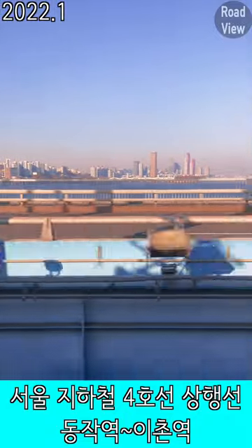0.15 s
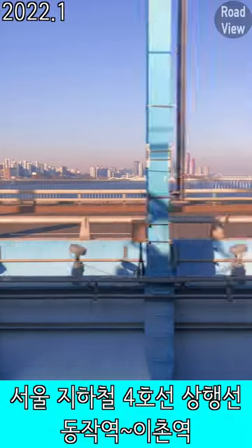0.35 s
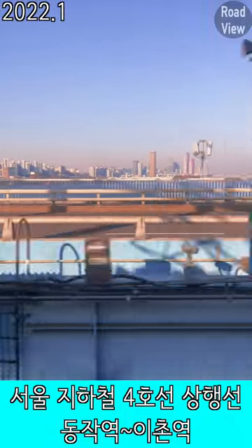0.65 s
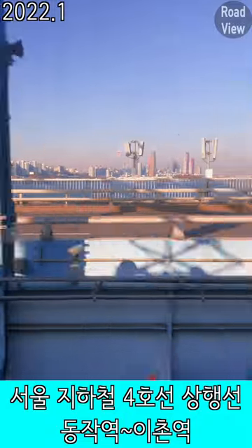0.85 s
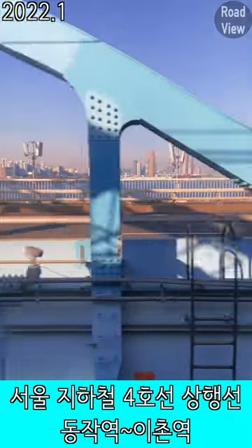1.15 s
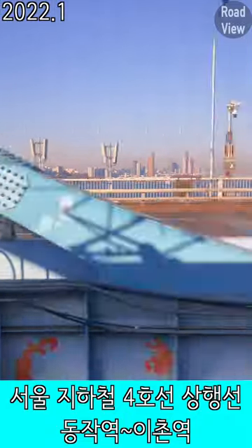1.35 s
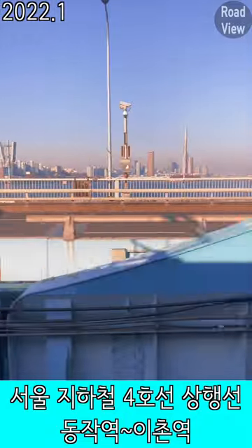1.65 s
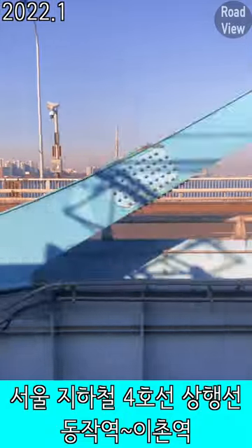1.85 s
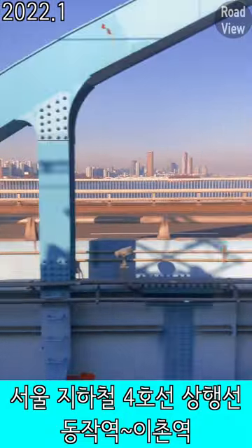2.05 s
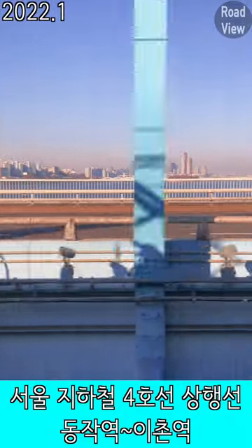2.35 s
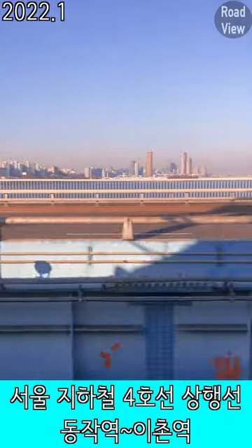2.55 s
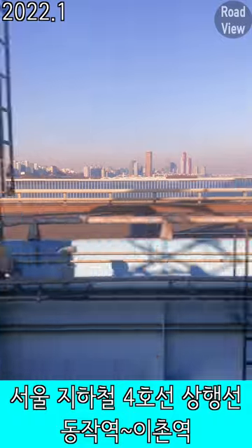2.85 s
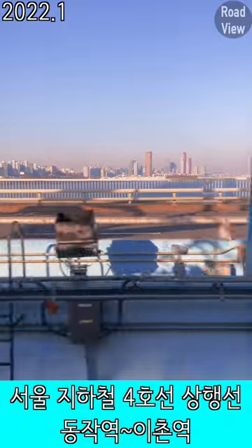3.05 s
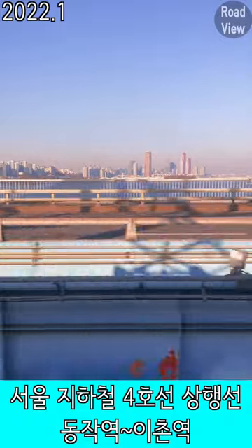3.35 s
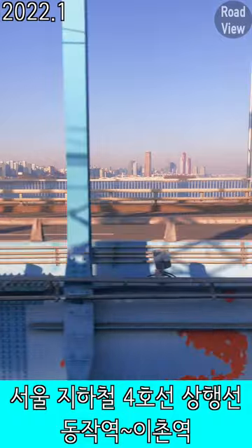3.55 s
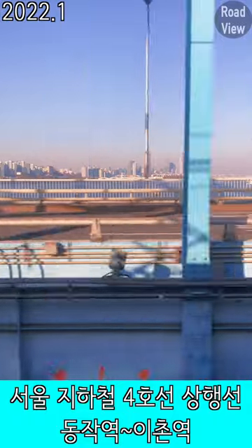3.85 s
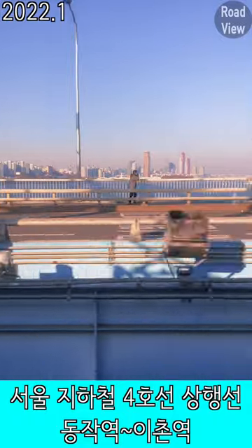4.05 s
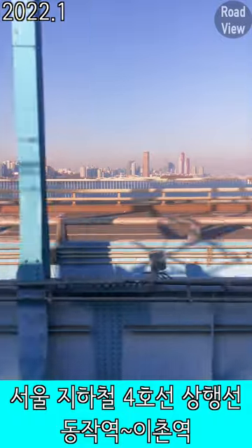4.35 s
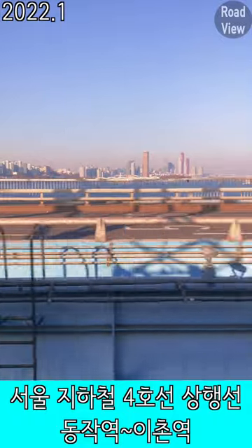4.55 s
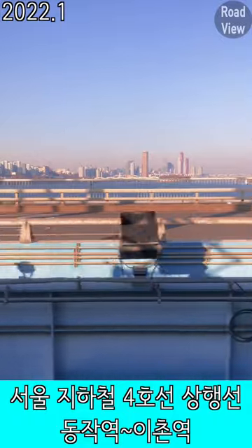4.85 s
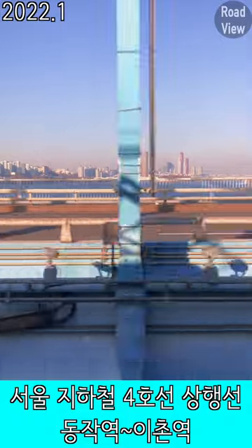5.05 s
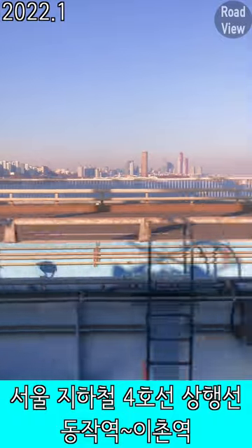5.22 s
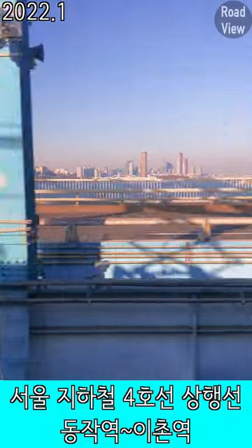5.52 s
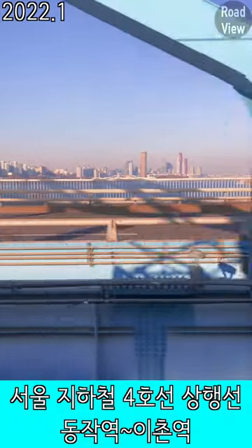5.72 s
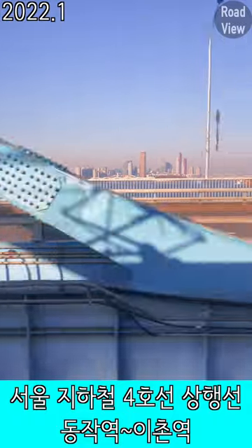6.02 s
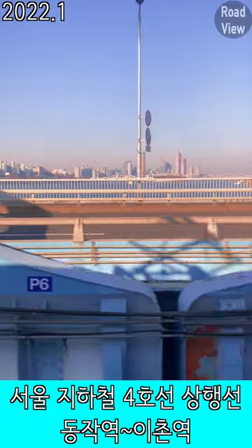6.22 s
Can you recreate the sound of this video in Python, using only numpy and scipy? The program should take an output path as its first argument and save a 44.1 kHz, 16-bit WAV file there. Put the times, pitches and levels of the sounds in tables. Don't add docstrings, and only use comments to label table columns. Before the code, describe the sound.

Steady train ride heard from within the cabin, near the door: deep girder boom and pulsing floor throb dominate, with quieter drumming wall panels, wheel roar and soft hiss above. Muffled joint knocks cluster between one and two and a half seconds, then again between four and five. Faint brief wheel whistles barely surface. Close two-channel microphone, bass nearly central, higher noise wider; the ride continues to the end.

```python
import sys
import numpy as np
from scipy import signal
from scipy.fft import rfft, irfft, next_fast_len
from scipy.io import wavfile
from scipy.ndimage import uniform_filter1d, map_coordinates

SR = 44100
rng = np.random.default_rng(int(sys.argv[2]) if len(sys.argv) > 2 else 0)


def linear_from_db(decibels):
    return 10 ** (np.asarray(decibels, float) / 20)


def to_wav(s):
    ch = np.atleast_2d(s).T
    pcm = np.round(np.clip(ch, -1, 1) * 32767)
    wavfile.write(sys.argv[1], SR, pcm.astype(np.int16))


N = 281343


def unit(x):
    return x / np.sqrt(np.mean(x ** 2) + 1e-20)


def along(points, hz):
    point_hz, value = np.transpose(points)
    return np.interp(np.log(hz + 1), np.log(point_hz + 1), value)


def spectrum(points):
    return lambda f: linear_from_db(along(points, f))


def wobble(knots_per_s):
    knots = rng.standard_normal(int(N * knots_per_s / SR) + 4)
    return map_coordinates(knots, [np.arange(N) * knots_per_s / SR])


def filtered(x, response):
    edge = SR // 10
    size = next_fast_len(N + 6 * edge)
    x = np.pad(x, [(0, 0), (edge, edge)], "reflect")
    bins_hz = np.fft.rfftfreq(size, 1 / SR)
    return irfft(rfft(x, size) * response(bins_hz), size)[:, edge:edge + N]


def modes(table):
    def response(f):
        total = 0
        for k, (hz, width_hz, db) in enumerate(table):
            damping = 1j * f * width_hz
            total = total + (-1) ** k * linear_from_db(db) * damping / (hz * hz - f * f + damping)
        return total
    return response


def narrow_noise(hz, width_hz):
    skirts = lambda f: modes([(hz, width_hz, 0)])(f) ** 2
    return unit(filtered(rng.standard_normal((2, N)), skirts))


def noise(response, patchy_db):
    z = signal.stft(rng.standard_normal((2, N)), nperseg=512)[2]
    field = uniform_filter1d(rng.standard_normal(z.shape[1:]), size=6, axis=0)
    field = uniform_filter1d(field, size=12, axis=1)
    pair = signal.istft(z * linear_from_db(patchy_db * unit(field)), nperseg=512)[1][:, :N]
    return unit(filtered(pair, response))


def bells(times_s, half_s):
    t = np.arange(N) / SR - np.reshape(times_s, (-1, 1))
    return np.exp(-(t / np.reshape(half_s, (-1, 1))) ** 2)


def bursts(times_s, levels_db, t60_s, rise_s):
    t = np.maximum(np.arange(N) / SR - np.reshape(times_s, (-1, 1)), 0)
    fall = linear_from_db(np.reshape(levels_db, (-1, 1)) - 60 * t / np.reshape(t60_s, (-1, 1)))
    return np.sum(fall * (1 - np.exp(-t / rise_s)), axis=0)


def ring(times_s, levels_db, hz, t60_s, rise_s):
    out = np.zeros(N + SR)
    t = np.arange(SR // 2) / SR
    rise = 1 - np.exp(-t / rise_s)
    for at_s, db, tone_hz in zip(times_s, levels_db, np.broadcast_to(hz, len(times_s))):
        tone = linear_from_db(db - 60 * t / t60_s) * rise * np.sin(2 * np.pi * tone_hz * t)
        out[round(at_s * SR):][:len(t)] += tone
    return out[:N]


# start_s (of the peak), length_s, pitch_hz, level_db
FLOOR_SWELLS = [(0.24, 0.093, 70, -18.5), (0.578, .12, 60.4, -19.5), (0.804, 0.27, 68.4, -25),
                (1.058, .2, 75.35, -18), (1.27, 0.2, 67.05, -13.5), (1.517, 0.19, 72.76, -15.5),
                (1.76, 0.095, 62.75, -18.5), (1.967, 0.13, 66.7, -17), (2.12, .14, 84.5, -15.5),
                (2.326, 0.084, 73.5, -12), (2.468, 0.075, 59.9, -15.5), (2.596, 0.084, 62.47, -18.5),
                (2.998, 0.12, 70, -23), (3.2, .1, 74.7, -16.5), (3.39, 0.065, 70, -17),
                (3.64, 0.06, 73.3, -19), (3.814, .1, 78.95, -18), (4.162, 0.076, 66.2, -18),
                (4.282, 0.045, 70.6, -13.5), (4.4, .1, 72.1, -16), (4.686, 0.13, 74.3, -16.5),
                (5, 0.094, 68.4, -14.5), (5.244, 0.13, 74.8, -15), (5.369, 0.07, 72.55, -6),
                (5.58, .17, 74.1, -7.5), (5.762, 0.091, 75.94, -10.5), (5.94, 0.064, 72.44, -16.5),
                (6.048, 0.12, 67.65, -14.5), (6.292, 0.085, 64, -18)]
FLOOR_HZ, FLOOR_DB = 70, -28.5


def floor():
    start_s, length_s, pitch_hz, level_db = np.transpose(FLOOR_SWELLS)
    swells = linear_from_db(level_db)[:, None] * bells(start_s, 0.588 * length_s)
    size = swells.sum(0) + linear_from_db(FLOOR_DB)
    hz = (pitch_hz @ swells + FLOOR_HZ * linear_from_db(FLOOR_DB)) / size
    swing = np.sin(2 * np.pi * np.cumsum(hz + 6 * wobble(18)) / SR)
    return linear_from_db(0.14 + 1.7 * wobble(22)) * size * swing * [[1], [0]]


# time_s, roar_db
TRACK = [(0, -39.5), (0.45, -42), (1.3, -40), (1.85, -40.5), (2.2, -41), (2.7, -42), (3.75, -44.5),
         (4.2, -42.5), (4.85, -44.5), (5.4, -41), (6.1, -42.5), (6.38, -39.5)]
# time_s, roar_swell_db, hiss_swell_db
BEAMS = [(0.0, 0.5, 2.5), (0.28, 0.5, 2), (0.63, 1.8, 2.5), (0.87, 1.5, 5.5), (0.97, 2, 4.5), (1.3, 4, 5.5),
         (1.68, 2.5, 3.5), (2.0, 2.5, 5.5), (2.12, 3, 4), (2.3, 0.5, 1.5), (2.48, 1, 0.5), (3.0, 0, 1),
         (3.271, 2, 1), (3.6, -1, 2), (4.05, 1, 1.5), (4.35, 2.5, 3), (4.69, 2.5, 2), (5.0, 0, 2.5),
         (5.15, 1.5, 1.5), (5.3, 4, 0), (5.62, 3.5, 3), (6.1, 0, -5), (6.29, 2, 0)]
ROAR_MEAN_DB = -42
BEAM_HALF_S, GUST_HALF_S = 0.079, 0.063


def drive():
    time_s, roar_db = np.transpose(TRACK)
    track_db = np.interp(np.arange(N) / SR, time_s, roar_db) - ROAR_MEAN_DB
    beam_s, roar_swell_db, hiss_swell_db = np.transpose(BEAMS)
    return track_db, roar_swell_db @ bells(beam_s, BEAM_HALF_S), hiss_swell_db @ bells(beam_s, GUST_HALF_S)


# pitch_hz, level_db (per Hz)
GIRDER = [(20, -30), (32, -12), (48, 1), (60, -0.5), (75, 0.5), (95, -1.5), (125, -0.5), (180, -4),
          (250, -6), (340, -11), (450, -21), (700, -51), (1500, -88)]


def girders(track_db):
    level_db = -16.75 + 0.26 * track_db + 0.77 * wobble(5.5)
    return linear_from_db(level_db) * noise(spectrum(GIRDER), patchy_db=-0.07)


# pitch_hz, level_db (per Hz)
PANEL = [(300, -44), (420, -5.5), (520, -0.5), (600, -4), (700, -1), (800, -6.5), (950, -9), (1150, -17),
         (1500, -28.5), (3000, -66)]


def panels(track_db, beam_db):
    level_db = -31.5 + 0.97 * track_db + 0.12 * beam_db + 0.7 * wobble(7.7)
    return linear_from_db(level_db) * noise(spectrum(PANEL), patchy_db=1.5)


# pitch_hz, level_db (per Hz)
WHEEL = [(600, -30), (1000, -1.5), (1300, -3), (1800, -4.5), (2400, -8), (3100, -9.5), (4200, -14),
         (6000, -17), (9000, -70)]
# pitch_hz, width_hz, level_db
RIM = [(2054, 136, -4.5), (3540, 480, -6.5), (1800, 29, -24), (2684, 62, -8)]


def wheels(track_db, beam_db, rough):
    def response(f):
        rim = np.abs(modes(RIM)(f)) * (f < 6000)
        return np.hypot(spectrum(WHEEL)(f), rim)
    level_db = ROAR_MEAN_DB + 4.5 + track_db + beam_db + 0.51 * rough
    return linear_from_db(level_db) * noise(response, patchy_db=1.5)


# pitch_hz, level_db (per Hz)
SEAL = [(2500, -25), (4000, -4.5), (6000, 2), (7400, -1), (7900, -3.5), (8700, -3), (10000, -6.5),
        (10700, -6.5), (11500, -17.5), (13000, -13), (15650, -22), (15800, -77)]


def seal_hiss(track_db, gust_db, rough):
    level_db = -48 + 1.23 * track_db + gust_db + 0.45 * rough + 0.23 * wobble(23)
    return linear_from_db(level_db) * noise(spectrum(SEAL), patchy_db=1.17)


# pitch_hz, level_db (per Hz)
VENT = [(6000, -46), (10000, -12), (12700, 3), (13600, -6), (14700, -1), (15200, -1), (15720, -7),
        (15800, -70)]


def vent(track_db, gust_db):
    level_db = -64.5 + 0.4 * (track_db + gust_db)
    return linear_from_db(level_db) * noise(spectrum(VENT), patchy_db=0)


def rolling():
    track_db, beam_db, gust_db = drive()
    rough = wobble(13)
    structure = girders(track_db) + panels(track_db, beam_db) + wheels(track_db, beam_db, rough)
    return structure + seal_hiss(track_db, gust_db, rough) + vent(track_db, gust_db)


# pitch_hz, width_hz, level_db (over the roar)
SINGING = [(1698, 61, -14), (1987, 47, -13.5), (2604, 66, -13), (1168, 66, -14.5), (3458, 300, -12)]


def singing():
    track_db, beam_db, _ = drive()
    drive_db = ROAR_MEAN_DB + 1.2 * (track_db + 0.39 * beam_db)
    total = 0
    for hz, width_hz, db in SINGING:
        total = total + linear_from_db(drive_db + db + 4.1 * wobble(5)) * narrow_noise(hz, width_hz)
    return total


# start_s (of the peak), length_s, pitch_hz, width_hz, level_db
SQUEALS = [(2.09, .16, 14330, 70, -61), (3.35, .07, 14300, 110, -62), (4.38, .07, 14200, 110, -62),
           (1.73, .05, 4450, 150, -44), (1.765, .06, 4620, 150, -42), (.88, .09, 5900, 500, -45),
           (1.69, .06, 5900, 400, -47), (.81, .04, 4800, 500, -48), (1.25, .06, 9000, 500, -54),
           (2.54, .08, 1150, 150, -43), (4.38, .12, 7000, 500, -52), (3.35, .25, 2000, 50, -46),
           (2.42, .12, 2000, 50, -45), (.25, .2, 10800, 600, -63), (6.3, .15, 10900, 500, -58)]


def squeals():
    total = 0
    for start_s, length_s, hz, width_hz, db in SQUEALS:
        total = total + linear_from_db(db) * bells(start_s, length_s / 2) * narrow_noise(hz, width_hz)
    return total


# start_s, peak_db, thump_db, clack_db, knock_hz
JOINTS = [(0.487, -20, 5, -14, 321), (1.211, -9.5, 1.5, -22, 385.3), (1.388, -26, 6, 1, 300),
          (1.51, -10.5, 6, -9.5, 281), (2.116, -11.5, 0, -13, 349.7), (2.153, -11, 1, -17, 318),
          (2.279, -26, 0, -1, 304), (2.457, -20, -5, -7, 281.4), (2.533, -23, 2, -25, 325),
          (3.764, -29, -6, -11, 292.8), (4.09, -15, 8.5, -7.5, 306), (4.365, -13.5, 7.5, -24, 349),
          (4.656, -18, 14, -11, 397.4), (4.678, -15.5, 11, -13, 347.3), (4.944, -13, 1, -9.5, 354.3),
          (5.227, -23, -7, -13, 369.5), (5.644, -23, 14, -18, 284.8), (6.282, -23, 5, -6, 293.6)]
# pitch_hz, width_hz, level_db
CLACK = [(707, 24, -0.5), (770, 31, 0.5), (839, 29, 5), (1164, 120, -17)]
# pitch_hz, level_db (per Hz)
BLOW = [(60, -45), (150, -3), (250, 3), (450, -5), (900, -17), (1500, -28), (3000, -72)]


def joints():
    start_s, peak_db, thump_db, clack_db, knock_hz = np.transpose(JOINTS)
    clack_hz = 709 + 36 * rng.standard_normal(len(start_s))
    thump = ring(start_s, peak_db + thump_db + 3, 118, t60_s=0.2, rise_s=0.014)
    knock = ring(start_s, peak_db - 0.7, knock_hz, t60_s=0.13, rise_s=0.0012)
    clack = ring(start_s, peak_db + clack_db + 4, clack_hz, t60_s=0.11, rise_s=0.00087)
    jolt = bursts(start_s, peak_db + clack_db + 16.5, t60_s=0.21, rise_s=0.0064)
    rattle = filtered(jolt * rng.standard_normal((2, N)), modes(CLACK))
    blow_shape = bursts(start_s, peak_db - 4.5, t60_s=0.27, rise_s=0.0022)
    blow = blow_shape * noise(spectrum(BLOW), patchy_db=3.4)
    return thump * [[1], [0]] + (knock + clack) * [[1], [0.3]] + rattle + blow


# start_s, peak_db, t60_s
TICKS = [
    (1.0902, -16, .022),
    (1.9794, -36, .03),
    (4.0672, -35, .03),
    (4.6947, -36, .03),
]
# pitch_hz, level_db (per Hz)
TICK = [(2500, -42), (4500, 2.5), (7000, 2.5), (9000, 1.5), (11000, -0.5), (12000, -5), (14000, -8),
        (16300, -11), (17000, -64)]
CABIN_T60_S = 0.086


def ticks():
    start_s, peak_db, t60_s = np.transpose(TICKS)
    crack = bursts(start_s, peak_db - 3.5, t60_s * 0.68, rise_s=0.0004)
    answer = bursts(start_s, peak_db - 12, CABIN_T60_S, rise_s=0.0027)
    return (crack + answer) * noise(spectrum(TICK), patchy_db=0)


def sway():
    return linear_from_db(-25) * bells(2.44, half_s=0.8) * narrow_noise(hz=46, width_hz=8.8)


# pitch_hz, likeness (0 to 1)
ALIKE = [(60, 0.97), (250, 1), (400, 0.84), (800, 0.5), (1500, 0.3), (2000, 0.55), (2500, 0.6),
         (3450, 0.65), (4200, 0.72), (5400, 0.94), (8400, 0.86), (11500, 1), (16000, 0.86)]
# pitch_hz, lead_rad
LEAD = [(0, 0), (340, 0.19), (780, 1.47), (1460, 1.75), (2670, 1.47), (3700, 1.75), (5400, 3), (8450, 6.5),
        (11800, 9), (14400, 12.5), (17000, 9.5)]


def ports(pair):
    turn = lambda f: np.arccos(np.clip(along(ALIKE, f), 0, 1)) / 2
    mid, side = filtered(pair, lambda f: np.array([np.cos(turn(f)), np.sin(turn(f))]))
    lead = lambda f: np.interp(f, *np.transpose(LEAD)) / 2
    return filtered(np.array([mid + side, mid - side]), lambda f: np.exp(1j * lead(f) * [[1], [-1]]))


def scene():
    return ports(floor() + rolling() + singing() + squeals() + joints() + ticks() + sway())


def band_limit(x):
    return signal.sosfilt(signal.butter(12, 16430, fs=SR, output="sos"), x)


def record(dry):
    band = filtered(dry, lambda f: f < 16400)
    held = band / (1 + np.abs(band / 1.14) ** 6) ** (1 / 6)
    to_end_s = np.arange(N)[::-1] / SR
    fade = np.sin(np.pi / 2 * np.minimum(to_end_s / 0.004, 1)) ** 2
    return band_limit(held * fade)


dry = scene()
out = record(dry)
to_wav(out)
```